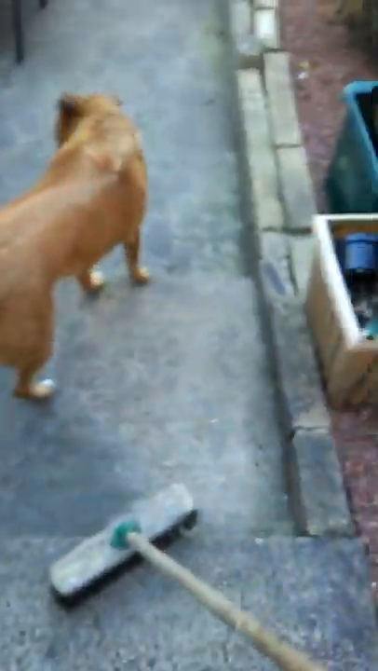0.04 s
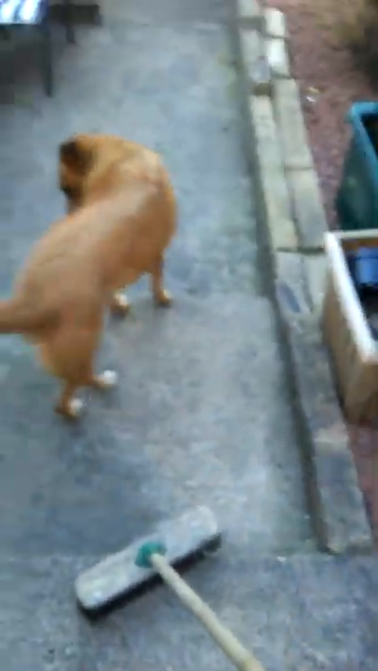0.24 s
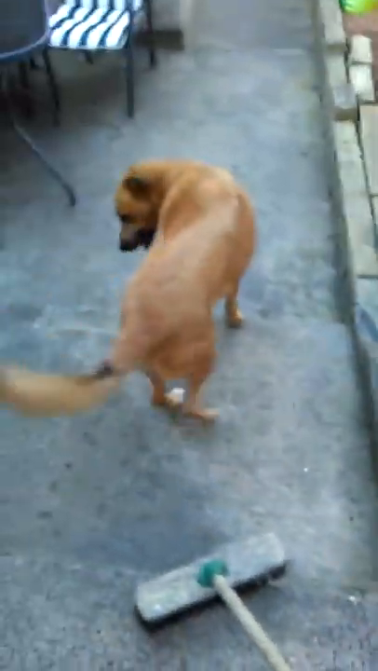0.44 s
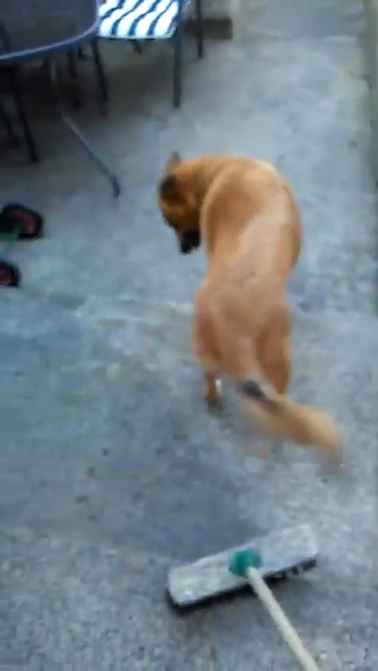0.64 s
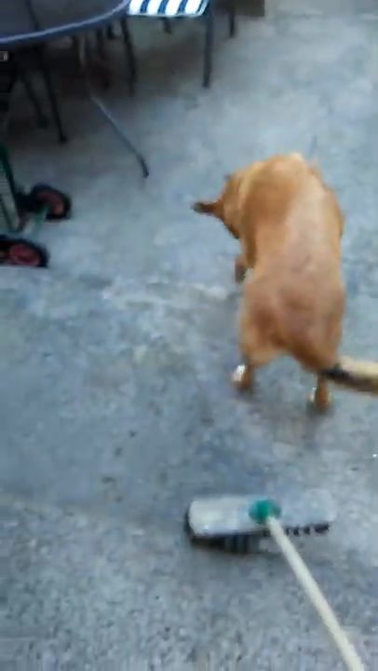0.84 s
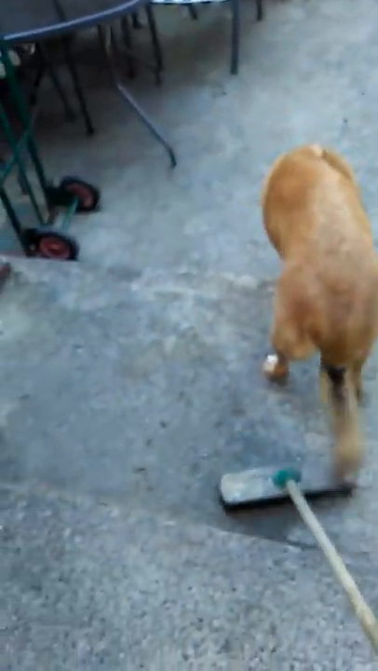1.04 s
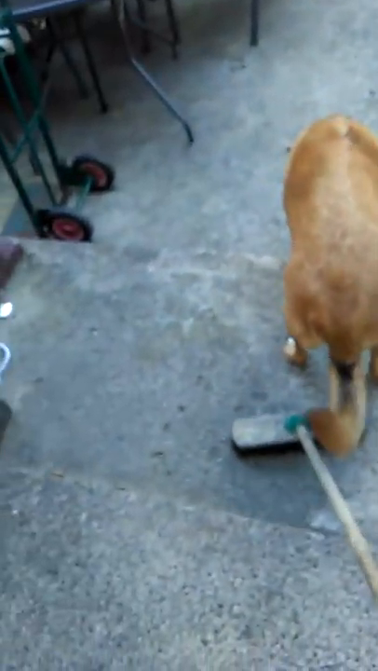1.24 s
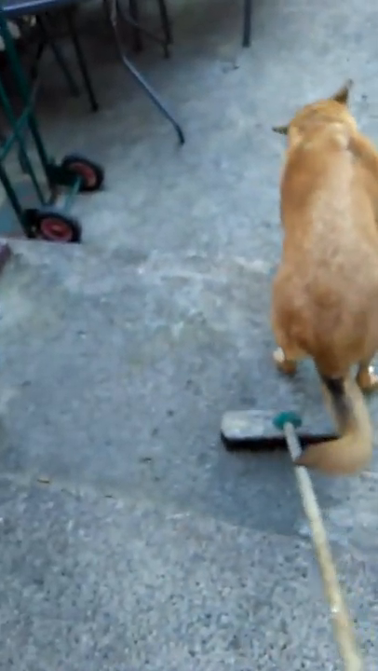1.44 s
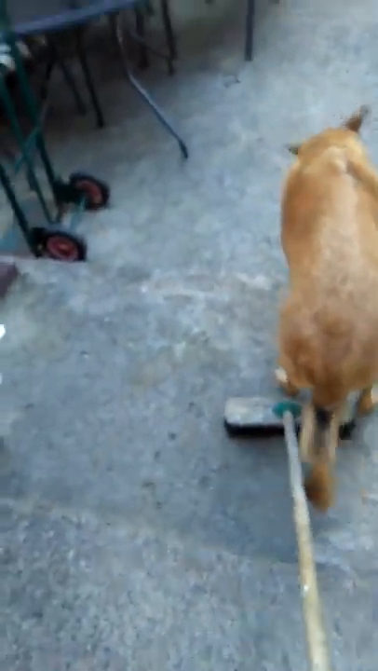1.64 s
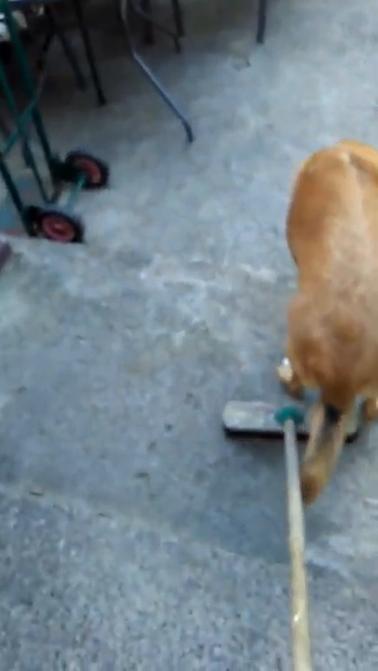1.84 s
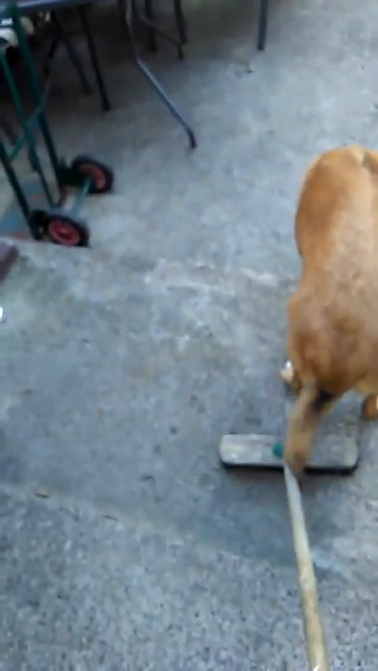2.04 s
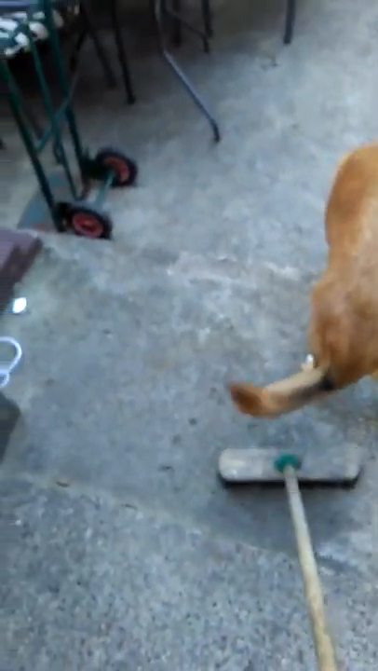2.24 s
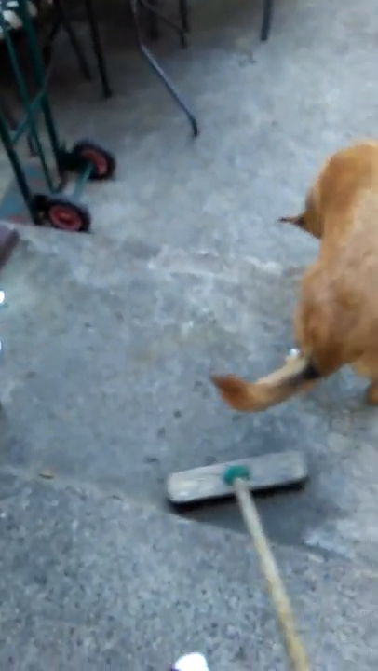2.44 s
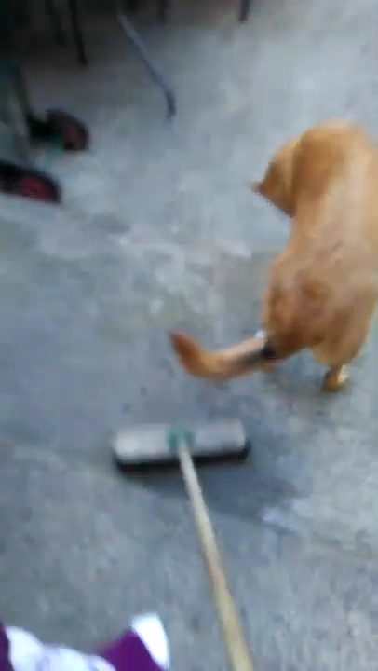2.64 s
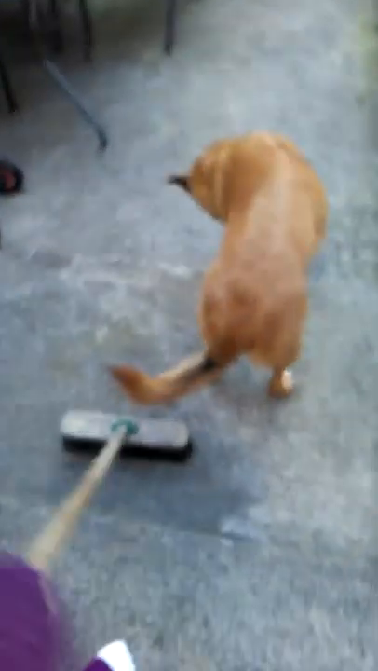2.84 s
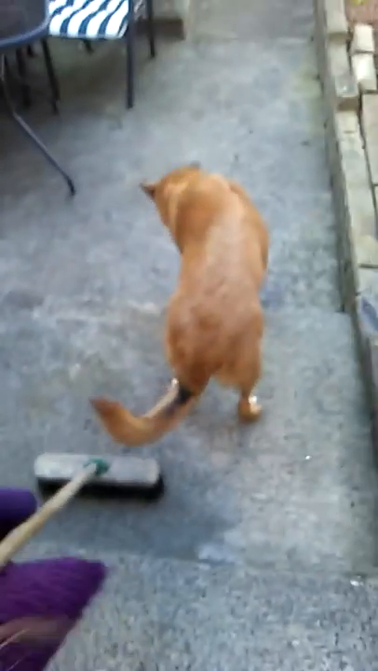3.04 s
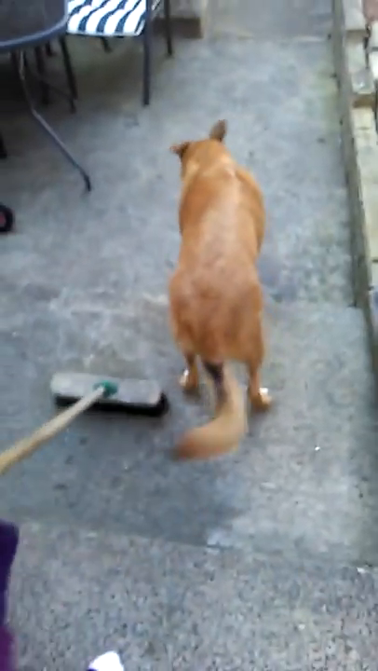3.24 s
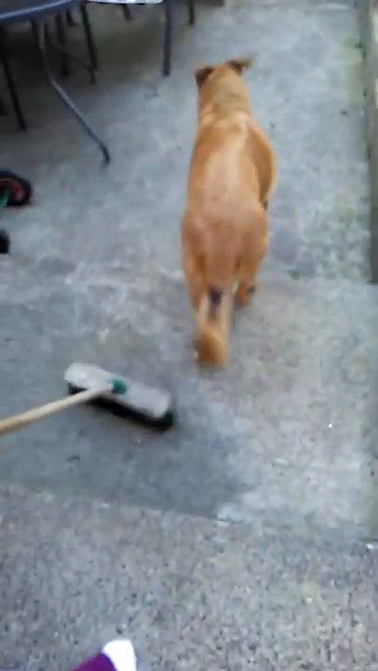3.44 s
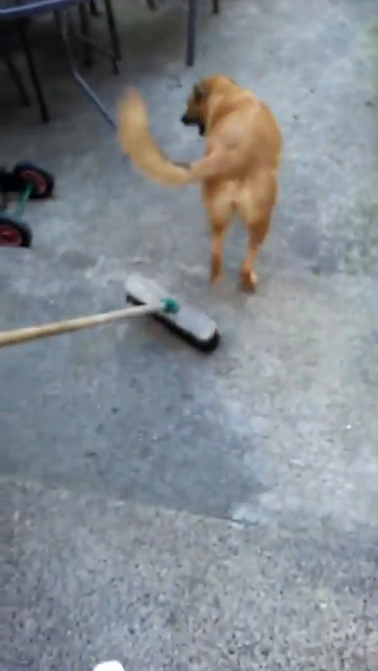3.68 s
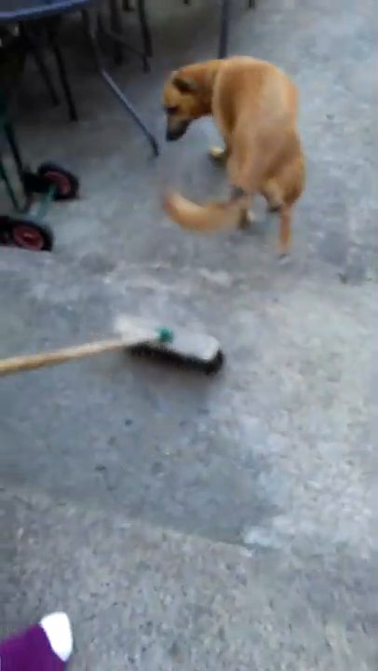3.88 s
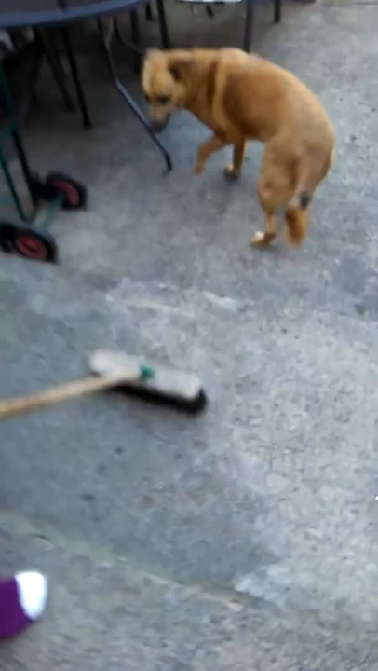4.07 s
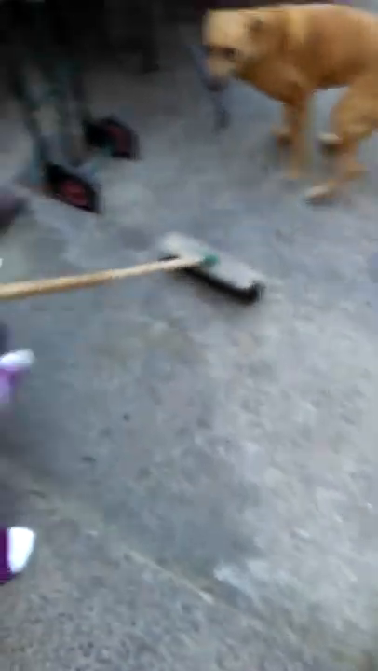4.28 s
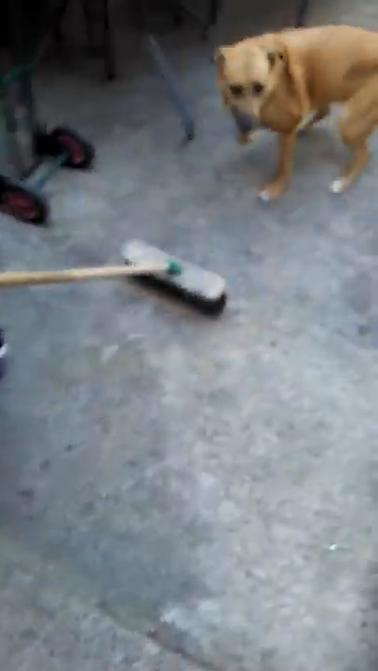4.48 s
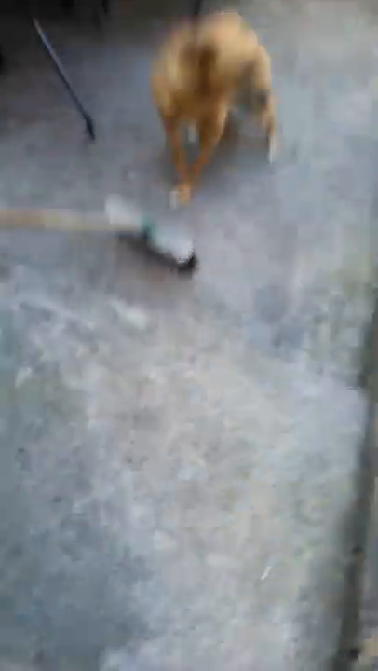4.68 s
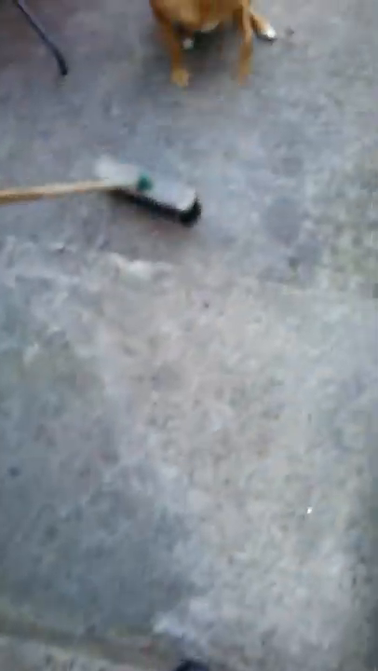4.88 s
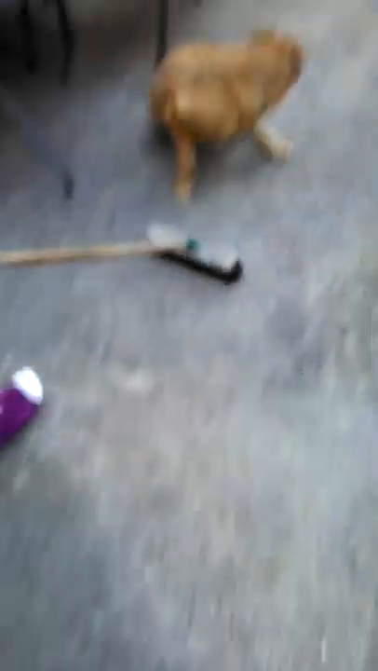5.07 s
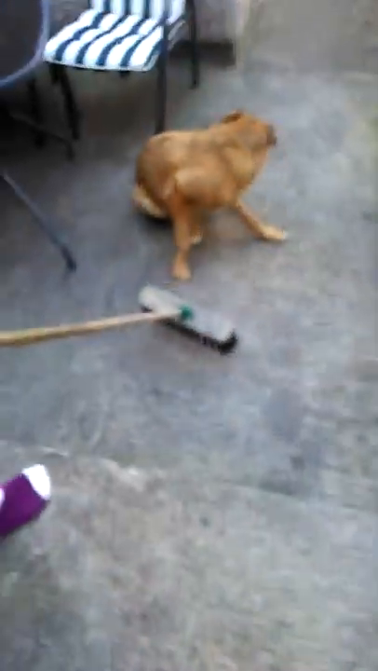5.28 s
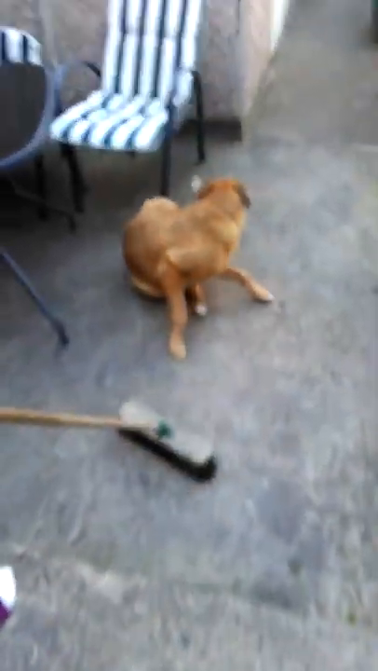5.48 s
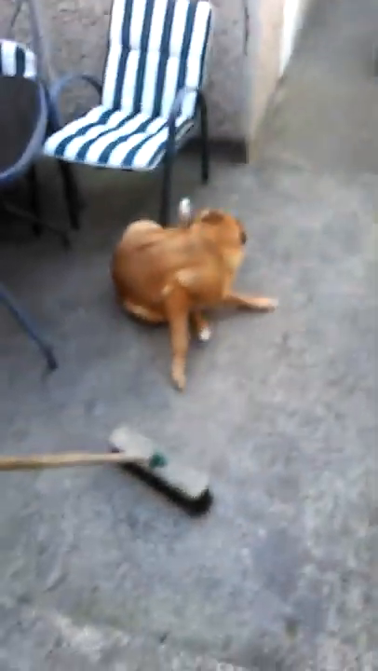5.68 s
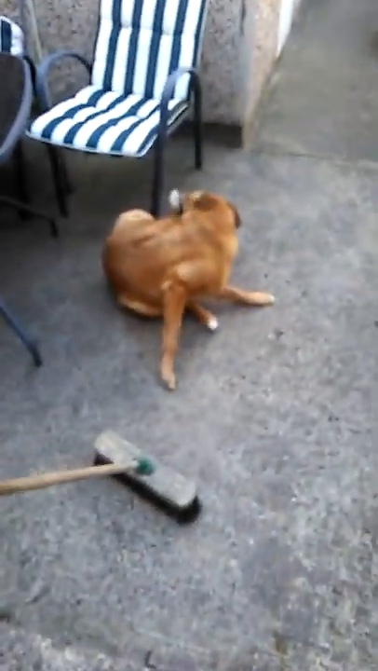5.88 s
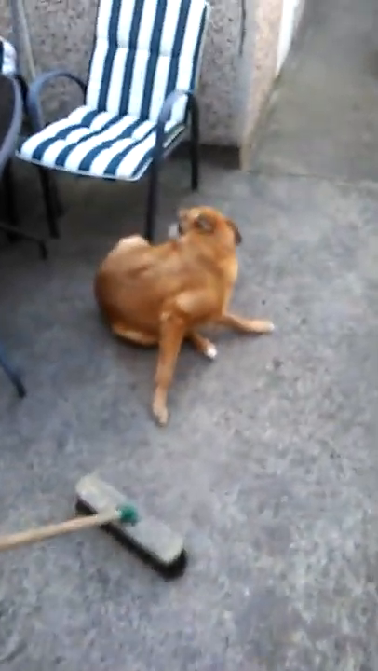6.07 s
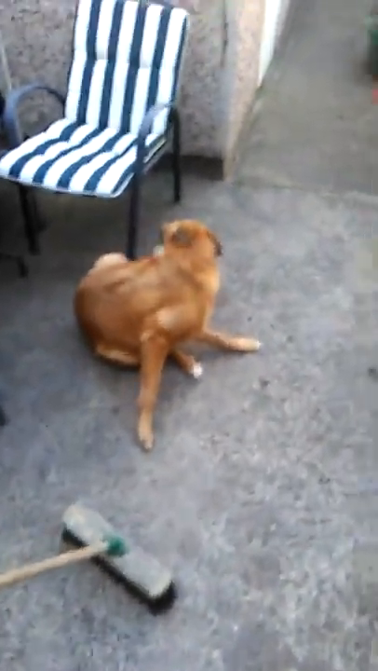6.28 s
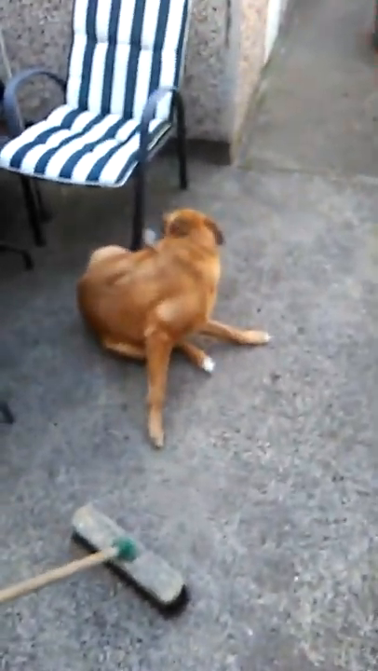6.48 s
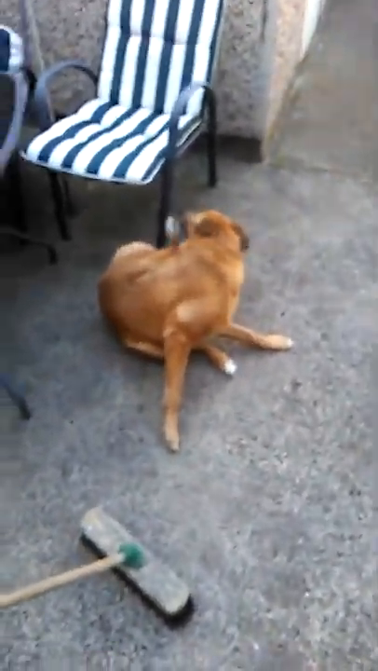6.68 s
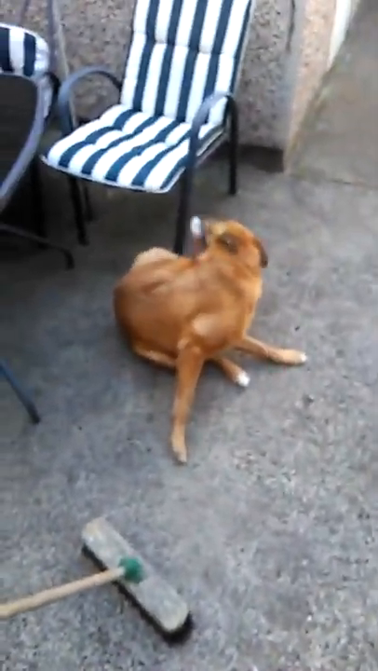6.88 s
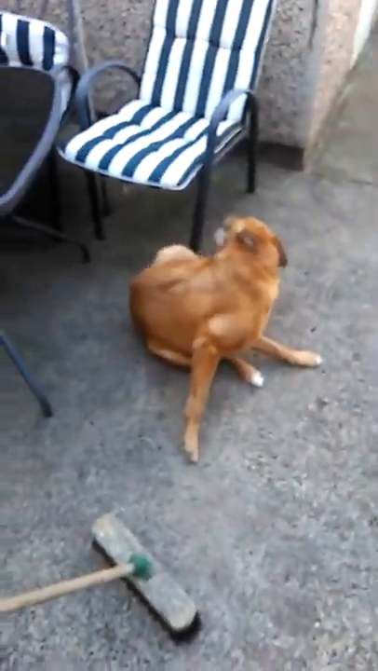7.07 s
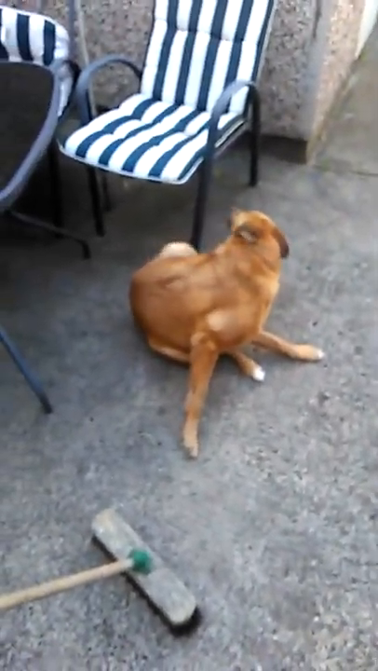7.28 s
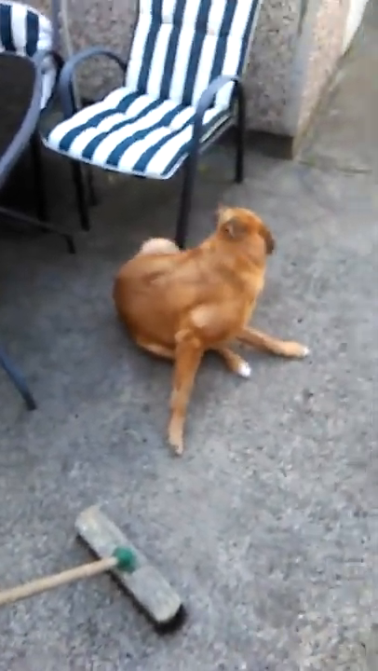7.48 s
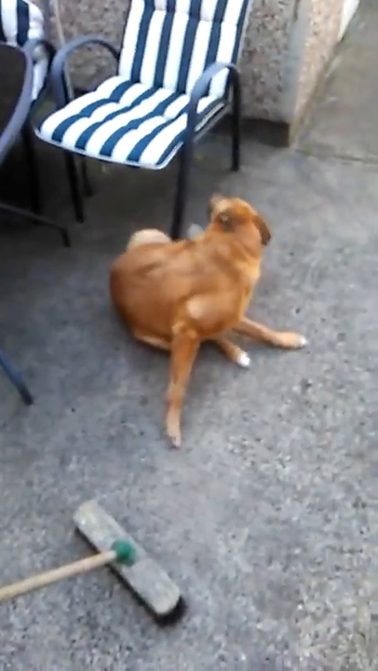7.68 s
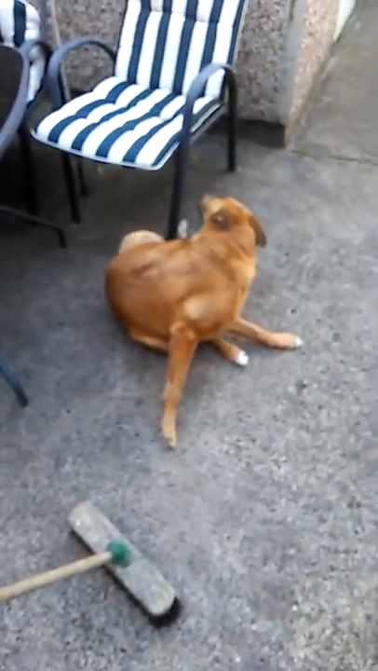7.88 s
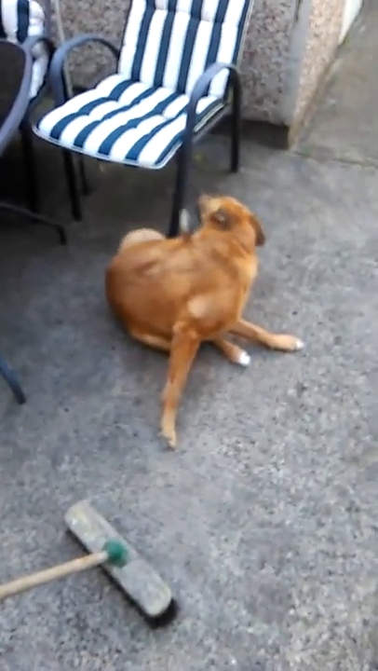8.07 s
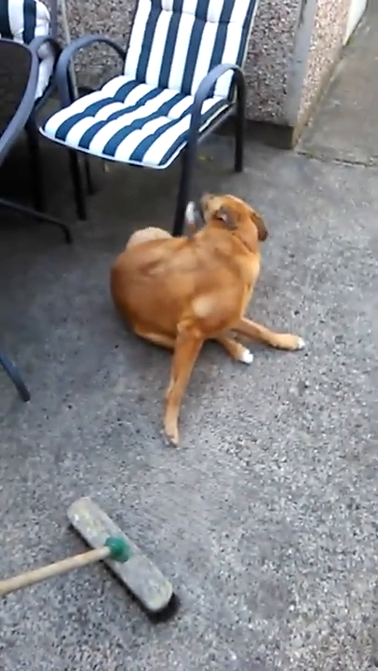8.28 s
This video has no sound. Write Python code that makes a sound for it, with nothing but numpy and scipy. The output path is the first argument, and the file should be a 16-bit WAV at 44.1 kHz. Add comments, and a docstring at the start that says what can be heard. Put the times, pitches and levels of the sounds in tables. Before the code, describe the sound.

Gritty bristle hisses and hollow wooden knocks of a broom on concrete, giving way to quiet rhythmic claw scratching over faint traffic.

```python
"""On a concrete patio a stiff push broom is dragged, dropped and shoved; its bristles hiss as enveloped, grainy
noise, and its wooden head knocks as it lands, a sum of decaying modes. Later a dog scratches in a
nearly steady beat, made of short noise rakes with a resonant squeak and dry snaps. Behind lie a far idling
engine (wavering sine orders), murmuring traffic and a breeze (low, lumpy noise) that bumps the two ports
of a hand-held phone, each port with its own treble resonance."""
import sys
import numpy as np
from scipy import signal
from scipy.fft import rfft, irfft, next_fast_len
from scipy.io import wavfile
from scipy.ndimage import uniform_filter1d, map_coordinates

SR = 44100
rng = np.random.default_rng(int(sys.argv[2]) if len(sys.argv) > 2 else 0)


def output_pcm(signal):
    """Save a mono or channel-first signal as 16-bit PCM at the path in sys.argv[1].

    Samples are clipped to [-1, 1] before scaling.
    """
    pcm = np.clip(np.atleast_2d(signal).T, -1, 1) * 32767
    wavfile.write(sys.argv[1], SR, np.round(pcm).astype(np.int16))


def linear_from_db(decibels):
    """Turn decibels (scalar or array-like) into linear amplitude factors; 0 gives 1."""
    return 10 ** (np.asarray(decibels, float) / 20)


N = 366912  # samples

# Spectral shape of the bristle hiss: [f/Hz, relative density level/dB]
BRISTLE_SPECTRUM = [(710, -63.5), (1200, -25), (1740, -9), (2080, -10.5), (2710, -9), (3380, -6.5),
                    (3880, -5.5), (4270, 0), (6110, -3.5), (8570, -13.5), (13600, -22.5), (14500, -46.5),
                    (15000, -66.5)]
# Resonances of the head driven by scraping: [f/Hz, width/Hz, level/dB]
HEAD_SCRAPE_MODES = [(612, 910, 1), (912, 77, 5), (1400, 300, -0.5), (1750, 630, -3.5)]
# Landings of the head, and one claw or grit tick at 3.956 s:
# [t/s, ring level/dB, crack level/dB, thud level/dB, favoured ring f/Hz]
STRIKES = [(0.246, -48, -38, -77, 2220), (1.093, -24.5, -25.5, -50, 1870), (1.102, -22, -25.5, -46, 1750),
           (1.556, -63, -44, -69, 1870), (3.128, -34, -60, -31.5, 493), (3.139, -14, -26.5, -26, 980),
           (3.498, -34, -32.5, -42.5, 1400), (3.536, -19, -19, -35, 1500), (3.956, -42.5, -40, -71, 2400),
           (4.031, -39, -35.5, -66.5, 580), (4.062, -29.5, -29, -42, 930), (4.577, -25, -28, -40, 1510),
           (5.005, -27, -21.5, -45, 1000), (5.02, -31, -23, -26, 520), (5.397, -45, -62, -46, 528),
           (5.475, -27, -29, -33.5, 1760), (5.486, -27, -25, -24, 610), (5.528, -49, -57, -37, 600),
           (6.014, -45, -66, -65, 900)]
# Modes of the struck head: [f/Hz, level/dB, t60/s]
HEAD_MODES = [(227, 3.5, 0.041), (319.5, 5, 0.047), (397.4, 8, 0.038), (653, -1, 0.038), (847, -4, 0.022),
              (974, 3.5, 0.019), (1500, 0, 0.023), (1748, -6, 0.042), (2197, -4, 0.018)]
# Shoves, the head set down and pushed at once:
# [touch t/s, time to full speed/s, time to stop/s, scrape level/dB, head share level/dB]
SHOVE_STROKES = [(1.093, 0.063, 0.11, -43, -14.5), (1.553, .13, 0.12, -38, -12.5),
                 (3.128, 0.11, 0.11, -29, -14.5), (3.501, .006, 0.16, -46.5, -5.5),
                 (3.534, 0.089, 0.066, -28.5, -17), (4.03, .05, .15, -55, -2.5),
                 (4.577, 0.021, 0.063, -31.5, -10.5), (5.004, 0.073, 0.11, -28, -15),
                 (5.466, 0.021, 0.063, -40.5, -4)]
# Drags, the head sliding without leaving the ground:
# [full speed t/s, speed-up/s, slow-down/s, scrape level/dB, head share level/dB]
DRAG_STROKES = [(0.03, 0.15, 0.076, -51.5, -7), (0.16, 0.097, 0.07, -57, -18),
                (0.273, 0.048, 0.065, -45.5, -10.5), (0.61, 0.24, 0.38, -58.5, -13),
                (0.83, 0.073, 0.1, -39.5, -18), (0.93, 0.088, 0.07, -39, -22.5),
                (1.355, 0.18, 0.18, -48.5, -19.5), (1.53, 0.052, 0.097, -48.5, -39),
                (2.01, 0.11, 0.26, -44, -26), (2.15, 0.11, .13, -52, -23.5),
                (2.35, 0.18, 0.056, -48.5, -13.5), (2.48, 0.15, 0.064, -45.5, -9),
                (2.558, 0.052, 0.044, -40.5, -5.5), (2.75, 0.18, .12, -43.5, -9),
                (2.88, 0.19, 0.25, -56, -12.5), (3.85, 0.034, 0.023, -79, 3), (4.248, 0.1, 0.1, -25, -13),
                (5.23, .02, 0.042, -66, 2.5), (4.73, 0.16, 0.052, -58.5, -9.5),
                (4.803, 0.053, 0.078, -49, -9.5), (4.9, 0.091, 0.21, -60, -4),
                (5.66, 0.25, 0.09, -55.5, -15), (6.05, 0.26, .15, -69, 5), (6.27, 0.087, 0.088, -69.5, 1)]
# Resonances of bent bristles creeping back: [f/Hz, width/Hz, level/dB]
CREEP_MODES = [(3850, 780, 11), (4200, 4800, 2)]
# Position of the broom: [t/s, left-right level/dB]
BROOM_PAN = [(0.0, 10), (0.19, -1), (0.34, 14.5), (0.53, -8.5), (0.8, 0.5), (2.32, -1.5), (3.26, -1.5),
             (3.44, 0.5), (3.71, -4), (3.95, 11.5), (4.03, -3), (4.92, 3), (5.35, 2), (5.51, 2), (6.4, 3)]
# One tuft or paw scuffing alone: [t/s, rise/s, fall/s, level/dB, f/Hz]
LONE_SCUFFS = [(0.064, .004, 0.04, -45.5, 4550), (2.56, 0.068, 0.038, -41.5, 3900),
               (3.43, .1, 0.14, -60, 3860), (4.435, 0.047, 0.093, -52, 1500),
               (4.44, 0.033, 0.091, -51.5, 496), (4.92, 0.096, .12, -64.5, 3950),
               (5.62, 0.093, 0.23, -58.5, 3000), (6.54, 0.023, 0.078, -66, 1400),
               (8.04, 0.081, 0.086, -65.5, 2350)]
# Shudders of the wooden handle as the head settles or drags: [t/s, rise/s, fall/s, level/dB]
HANDLE_SHUDDERS = [(1.78, 0.064, 0.049, -43.5), (5.035, 0.0035, 0.072, -35.5), (5.53, 0.037, 0.055, -37),
                   (5.665, 0.065, 0.063, -38), (5.885, 0.054, .055, -45), (6.08, 0.075, 0.045, -58.5),
                   (6.19, .04, 0.059, -55.5), (6.53, 0.045, .12, -61.5), (6.685, 0.044, 0.035, -53)]
# Bending modes of the handle: [f/Hz, level/dB]
HANDLE_MODES = [(125, -0.5), (205, -1), (300, -12.5)]
# Hind claws raking the coat: [t/s, level/dB, low brush level/dB, squeak f/Hz]
RAKES = [(6.527, -62, -1, 3730), (6.669, -60, 2, 4500), (6.8332, -46.5, -3.5, 4440),
         (6.9985, -51.5, -1.5, 2830), (7.1685, -60.5, -4, 4280), (7.333, -51, -2.5, 2720),
         (7.5143, -44.5, -9, 4380), (7.695, -53.5, -3, 4340), (7.884, -49, -4, 4400),
         (8.0572, -45.5, -4.5, 2400), (8.114, -49, -6, 5400), (8.145, -48.5, -24, 3740),
         (8.175, -55, -1, 5540), (8.2337, -51, -6, 4100)]
# Spectral shape of the coat: [f/Hz, relative density level/dB]
COAT_SPECTRUM = [(760, -53), (1300, -18), (2080, -9), (2450, -4.5), (3300, -8.5), (4220, -2.5),
                 (5020, -8.5), (5970, -4), (6820, -26), (8720, -15), (9560, -27), (12700, -43),
                 (15000, -44)]
# A claw catching and letting go: [t/s, peak level/dB]
CLAW_SNAPS = [(6.841, -56), (7.5184, -38), (7.6989, -47.5), (8.0598, -49), (8.116, -38.5), (8.1478, -42),
              (8.1773, -39.5)]
# Decay of the wall echo: [f/Hz, t60/s]
WALL_DECAY = [(200, 0.19), (2000, 0.24), (10000, 0.06)]
# Level of the far engine: [t/s, level/dB]
ENGINE_LEVEL = [(0.0, -34.5), (0.1, -65), (0.12, -50), (1.16, -47), (1.47, -61), (1.58, -44), (1.67, -60),
                (1.86, -39.5), (1.96, -50.5), (3.61, -49.5), (6.09, -62.5), (6.3, -81)]
# Orders of the engine: [multiple of firing rate, level/dB]
ENGINE_ORDER_LEVELS = [(1, -0.5), (1.5, -18), (2, -29), (2.5, -22.5)]
# Puffs of air on the phone: [t/s, half length/s, flutter level/dB, push level/dB, left-right level/dB]
AIR_PUFFS = [(0.0, 0.16, -55.5, -38.5, -14.5), (1.806, 0.097, -45, -39.5, 0), (4.065, 0.11, -55.5, -70, 0),
             (5.06, 0.18, -59, -53.5, -1), (5.584, 0.28, -46, -48.5, -2), (5.893, 0.072, -51, -56, 4),
             (6.05, 0.14, -79, -58, 6), (6.54, 0.31, -79.5, -53, 8), (7.147, 0.22, -78, -62, 3),
             (8.18, 0.11, -63.5, -40, -19)]
# Spectral shapes of the breeze, faster flutter and slower push: [f/Hz, relative density level/dB]
FLUTTER_SPECTRUM = [(40, -27.5), (70, -4), (120, -0.5), (210, -6.5), (320, -10.5), (600, -36), (1200, -120)]
PUSH_SPECTRUM = [(15, -54.5), (30, -18.5), (45, -4.5), (60, 0), (90, -13), (130, -15), (200, -120)]
# Spectral shape of the traffic: [f/Hz, relative density level/dB]
TRAFFIC_SPECTRUM = [(70, -34), (120, -6), (220, -7), (400, -9.5), (700, -11.5), (1000, -12), (1200, -22.5),
                    (1700, -24.5), (2400, -23), (3200, -26), (4300, -22.5), (5200, -25), (8000, -29),
                    (13800, -32.5), (15000, -51.5)]
# Left-right likeness of near sources and of traffic: [f/Hz, correlation]
NEAR_LIKENESS = [(60, 1), (180, 1), (540, 0.7), (1620, -0.17), (4870, 0.16), (14600, -0.037)]
FAR_LIKENESS = [(60, 0.94), (180, 1), (540, 0.44), (1620, -0.08), (4870, -0.2), (14600, -0.71)]
# Unequal response of the two ports: [f/Hz, left-right level/dB]
PORT_RESPONSE = [(60, -0.5), (92, 3), (140, -1), (210, 1), (330, 0), (500, 1.5), (760, 1.5), (1160, -1),
                 (1760, 4.5), (2690, 2.5), (4110, 8), (6270, -7.5), (9570, -4), (14600, 1.5)]

STILL_DB = 20  # fall from full speed to standstill
TOUCH_DB, STROKE_BEND = 10, 2.12  # a shove starts this far under its peak; power law of the swell
TOUCH_S = 0.0052  # the tufts meet the ground one after another
LANDING_DB, LANDING_S = 13, 0.026  # the head is pressed harder just after it touches
SETTLE_DB, SETTLE_DB_PER_S = -25.5, 74.5  # grit and bristles settle after a stroke
BRIGHT_HZ, BRIGHT_PER_DB, BRIGHT_AT_DB = 5800, 0.18, -29.5  # faster strokes are brighter above this pitch
SCUFF_SHARPNESS = 8.5  # Q of each scuff's resonance
SNAP_T60_S = 0.01
FIRING_HZ = 55.9
CALM_FLUTTER_DB, CALM_PUSH_DB, CALM_SIDE_DB = -66.5, -61, 1.5
TRAFFIC_DB = -64


def sweeping():
    """Stick-slip friction: many bristle tips slip over grit, and their pressure drives the wooden head."""
    tips_gain, head_gain, settle_gain = strokes()
    pan_db, = curves(BROOM_PAN)
    clumps = linear_from_db(0.93 * wobble(60))  # tufts let go together

    tips = spread(hiss(grain_db=1.5, rate=600), spectrum(BRISTLE_SPECTRUM), NEAR_LIKENESS)
    tips = streaky(patchy(tips, depth_db=2.5), depth_db=1.8)
    treble = filtered(tips, lambda hz: 1 / (1 + (BRIGHT_HZ / (hz + 1)) ** 6))
    tips_db = 20 * np.log10(tips_gain + 1e-4)
    bright = linear_from_db(BRIGHT_PER_DB * (tips_db - BRIGHT_AT_DB))
    tips = tips + (bright - 1) * treble

    head = spread(hiss(grain_db=2, rate=190), resonances(HEAD_SCRAPE_MODES), NEAR_LIKENESS)
    head = patchy(head, depth_db=4.0)
    creep = spread(hiss(grain_db=1.0, rate=340), resonances(CREEP_MODES), NEAR_LIKENESS)
    creep = patchy(creep, depth_db=8)
    return clumps * panned(pan_db) * (tips_gain * tips + head_gain * head + settle_gain * creep)


def strokes():
    """Friction follows speed: gains of tips, head and settling as each stroke speeds up, stops and relaxes."""
    t = np.arange(N) / SR
    tips, head, settle = np.zeros((3, N))
    for landed, rows in ((True, SHOVE_STROKES), (False, DRAG_STROKES)):
        for s, rise_s, fall_s, db, head_db in rows:
            top = s + landed * rise_s  # moment of full speed
            start_db = TOUCH_DB if landed else STILL_DB
            gain = linear_from_db(db + swell(top, rise_s, fall_s, STROKE_BEND, start_db))
            gain *= np.clip((t - s) / TOUCH_S, 1 - landed, 1)  # a shove is silent before touching
            press_db = landed * LANDING_DB * np.exp(-abs(t - s) / LANDING_S)
            settle_db = db + SETTLE_DB - SETTLE_DB_PER_S * abs(t - top - fall_s)
            tips += gain
            head += gain * linear_from_db(head_db + press_db)
            settle += linear_from_db(settle_db) * (t > top)
    return tips, head, settle


def knocks():
    """Modal excitation: strikes, nearly all landings, ring the modes at new strengths, with a noise crack."""
    out = np.zeros((2, N + SR))
    t = np.arange(SR // 8) / SR
    cracks = spread(rng.standard_normal((2, N)), spectrum(BRISTLE_SPECTRUM), NEAR_LIKENESS)
    for s, ring_db, crack_db, thud_db, strike_hz in STRIKES:
        at = round(s * SR)
        ring = 0
        for hz, level, t60 in HEAD_MODES:
            # each strike favours the modes near one pitch; the lowest modes make the thud
            strike_db = thud_db if hz < 450 else ring_db - 10.6 * abs(np.log2(hz / strike_hz))
            decay = linear_from_db(level + rng.normal(0, 1.7) + strike_db - 60 * t / t60)
            detuned_hz = hz * (1 + 0.0545 * rng.normal())
            ring = ring + decay * np.sin(2 * np.pi * detuned_hz * t)
        crack = linear_from_db(crack_db - 60 * t / 0.025) * cracks[:, at:at + len(t)]
        onset = 1 - np.exp(-t / 0.0014)
        out[:, at:at + len(t)] += (crack - ring) * onset
    return out[:, :N] * panned(curves(BROOM_PAN)[0])


def scuffs():
    """Resonant filtering of friction noise: short swells in one resonance each."""
    noise = spread(hiss(grain_db=3.5, rate=300), np.ones_like, NEAR_LIKENESS)
    out = 0
    for s, rise_s, fall_s, db, hz in LONE_SCUFFS:
        tone = unit(signal.lfilter(*signal.iirpeak(hz, SCUFF_SHARPNESS, SR), noise))
        out = out + linear_from_db(db + swell(s, rise_s, fall_s, bend=1.3)) * tone
    return panned(curves(BROOM_PAN)[0]) * out


def shudder():
    """Friction-driven bending: low handle modes are kept going by uneven drag."""
    t = np.arange(N) / SR
    gain = sum(linear_from_db(db + swell(s, rise_s, fall_s, bend=1.13)) for s, rise_s, fall_s, db in HANDLE_SHUDDERS)
    modes = 0
    for hz, db in HANDLE_MODES:
        waver = linear_from_db(2.5 * wobble(14))
        modes = modes + linear_from_db(db) * waver * np.sin(2 * np.pi * hz * t + 2.5 * wobble(10))
    return gain * unit(modes)


def scratching():
    """Friction on hair: rakes through fur with a quick start, a soft tail and a squeak of claw on hair."""
    out = np.zeros((2, N + SR))
    t = np.arange(SR // 4) / SR
    fur = spread(hiss(grain_db=3, rate=400), spectrum(COAT_SPECTRUM), NEAR_LIKENESS)
    fur = patchy(fur, depth_db=4.5)
    low_modes = resonances([(640, 155, 18), (1170, 1500, -17)])  # f/Hz, width/Hz, level/dB
    body = spread(hiss(grain_db=0.0, rate=250), low_modes, NEAR_LIKENESS)
    envelope = linear_from_db(-60 * t / .13) * (1 - np.exp(-t / .005)) ** 2
    for s, db, low_db, hz in RAKES:
        at = round(s * SR)
        squeak = unit(signal.lfilter(*signal.iirpeak(hz, 12, SR), rng.standard_normal((2, len(t)))))
        rake = 0.59 * squeak
        rake[:, :N - at] += (fur + linear_from_db(low_db) * body)[:, at:at + len(t)]
        out[:, at:at + len(t)] += rake * linear_from_db(db) * envelope
    return out[:, :N]


def snaps():
    """Sudden release: a claw lets go in a very short, decaying burst in the colour of the coat."""
    t = np.arange(N) / SR
    gain = sum(linear_from_db(db - 60 * abs(t - s) / SNAP_T60_S) * (t >= s) for s, db in CLAW_SNAPS)
    coat = spectrum(COAT_SPECTRUM)
    softened = lambda hz: coat(hz) / (1 + (hz / 7500) ** 6)
    return gain * spread(rng.standard_normal((2, N)), softened, NEAR_LIKENESS)


def walls(x):
    """Reverberation: the house walls answer with delayed noise whose frequencies die at their own speeds."""
    hz, t, z = signal.stft(rng.standard_normal((2, SR // 2)), SR, nperseg=256)
    decay = linear_from_db(-60 * t / along(WALL_DECAY, hz)[:, None])
    tail = signal.istft(z * decay, SR, nperseg=256)[1]
    delayed = np.pad(x, ((0, 0), (300, 0)))
    return signal.fftconvolve(delayed, tail / np.linalg.norm(tail[0]), axes=1)[:, :N]


def engine():
    """Periodic firing: a far idle of a few unsteady low orders, faded out after about six seconds."""
    db, = curves(ENGINE_LEVEL)
    phase = 2 * np.pi * np.cumsum(FIRING_HZ * (1 + 0.01655 * wobble(22))) / SR
    tones = 0
    for order, level in ENGINE_ORDER_LEVELS:
        waver = linear_from_db(1.5 * wobble(7))  # the idle hunts a little
        tones = tones + linear_from_db(level) * waver * np.sin(order * phase + 0.22 * wobble(17))
    fade = np.clip((ENGINE_LEVEL[-1][0] - np.arange(N) / SR) / .15, 0, 1)
    return linear_from_db(db) * fade * np.sqrt(2) * tones


def breeze():
    """Turbulent pressure: lumpy low noise on the phone, a calm stir and a few puffs."""
    flutter = spread(hiss(grain_db=3.5, rate=32), spectrum(FLUTTER_SPECTRUM), [(100, 1.0)])
    push = spread(hiss(grain_db=6.5, rate=49), spectrum(PUSH_SPECTRUM), [(50, 0.83)])
    calm = linear_from_db(CALM_FLUTTER_DB) * flutter + linear_from_db(CALM_PUSH_DB + 2 * wobble(2.1)) * push
    out = panned(CALM_SIDE_DB)[:, None] * calm
    for s, half_s, flutter_db, push_db, pan_db in AIR_PUFFS:
        gain = panned(pan_db)[:, None] * linear_from_db(swell(s, half_s, half_s, bend=0.78))
        out = out + gain * (linear_from_db(flutter_db) * flutter + linear_from_db(push_db) * push)
    return out


def traffic():
    """Superposition of distant sources: a smooth far murmur that drifts a little."""
    murmur = linear_from_db(.4 * wobble(1.5)) * hiss(grain_db=.9, rate=8)
    return linear_from_db(TRAFFIC_DB) * patchy(spread(murmur, spectrum(TRAFFIC_SPECTRUM), FAR_LIKENESS), depth_db=1.9)


def hiss(grain_db, rate):
    """Amplitude modulation: two noises roughened into grains, about rate a second."""
    return rng.standard_normal((2, N)) * linear_from_db(grain_db * np.array([wobble(rate), wobble(rate)]))


def wobble(rate):
    """Interpolated random process: a smooth curve, rate knots a second."""
    knots = rng.standard_normal(int(N * rate / SR) + 4)
    return map_coordinates(knots, [np.arange(N) * rate / SR])


def swell(s, rise_s, fall_s, bend, start_db=STILL_DB):
    """Power-law envelope in dB, 0 at s; start_db down rise_s before, STILL_DB down fall_s after."""
    t = np.arange(N) / SR - s
    return -np.where(t < 0, start_db * abs(t / rise_s) ** bend, STILL_DB * abs(t / fall_s) ** bend)


def spread(pair, gain, alike):
    """Interchannel coherence: two unrelated signals coloured and mixed to a given likeness, rms 1."""
    turn = lambda hz: np.arccos(np.clip(along(alike, hz), -1, 1)) / 2
    mid, side = filtered(pair, lambda hz: gain(hz) * np.array([np.cos(turn(hz)), np.sin(turn(hz))]))
    return unit(np.array([mid + side, mid - side]))


def patchy(pair, depth_db):
    """Time-frequency modulation: random gain patches, about 700 Hz by 110 ms, each side its own."""
    z = signal.stft(pair, nperseg=256)[2]
    field = uniform_filter1d(rng.standard_normal(z.shape), size=4, axis=1)
    field = uniform_filter1d(field, size=40, axis=2)
    return unit(signal.istft(z * linear_from_db(depth_db * unit(field)), nperseg=256)[1][:, :N])


def streaky(pair, depth_db):
    """Narrow-band persistence: bands of about 130 Hz by 200 ms, as single bristles sing for a while."""
    z = signal.stft(pair, nperseg=1024)[2]
    field = uniform_filter1d(rng.standard_normal(z.shape[1:]), size=3, axis=0)
    field = uniform_filter1d(field, size=18, axis=1)
    return unit(signal.istft(z * linear_from_db(depth_db * unit(field)), nperseg=1024)[1][:, :N])


def resonances(modes):
    """Damped oscillators in parallel: response of a few (f/Hz, width/Hz, level/dB) resonances."""
    return lambda f: sum(linear_from_db(db) * 1j * f * w / (c * c - f * f + 1j * f * w) for c, w, db in modes)


def spectrum(points):
    """Spectral shaping: amplitude gain as a function of frequency from (f/Hz, level/dB) points."""
    return lambda hz: linear_from_db(along(points, hz))


def filtered(x, response):
    """Linear filtering: the spectrum of x times a complex response of frequency."""
    m = next_fast_len(N + SR // 2)
    return irfft(rfft(x, m) * response(np.fft.rfftfreq(m, 1 / SR)), m)[..., :N]


def along(points, hz):
    """Logarithmic pitch: (f/Hz, value) points interpolated on a log axis."""
    f, v = np.transpose(points)
    return np.interp(np.log(hz + 1), np.log(f + 1), v)


def curves(rows):
    """Linear interpolation: one value per sample for each column after the time."""
    s, *cols = np.transpose(rows)
    return [np.interp(np.arange(N) / SR, s, c, right=c[-1]) for c in cols]


def panned(db):
    """Level-difference stereo: left and right gains for a level difference."""
    return linear_from_db(np.array([db / 2, -db / 2]))


def unit(x):
    """Power normalization: scale to rms 1."""
    return x / np.sqrt(np.mean(x ** 2) + 1e-20)


def scene():
    """Superposition: near sources with their echo, over the handle and the far sources."""
    near = sweeping() + knocks() + scratching() + snaps() + scuffs()
    return near + linear_from_db(-12.0) * walls(near) + shudder() + engine() + breeze() + traffic()


def roll_off(x):
    """The treble ends steeply here."""
    return signal.sosfilt(signal.butter(12, 15200, fs=SR, output="sos"), x)


def record(dry):
    """Port resonance: each port of the phone colours the sound its own way, most of all the treble."""
    mix = filtered(dry, lambda hz: panned(along(PORT_RESPONSE, hz)))
    return roll_off(mix)


dry = scene()
out = record(dry)
output_pcm(out)
```